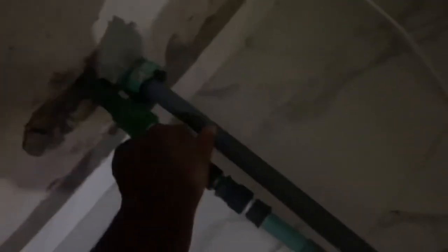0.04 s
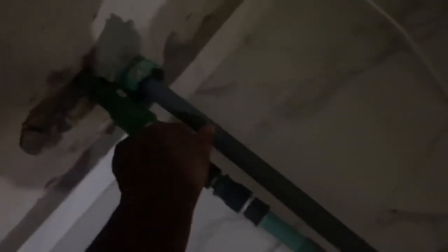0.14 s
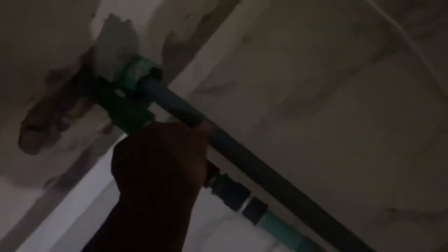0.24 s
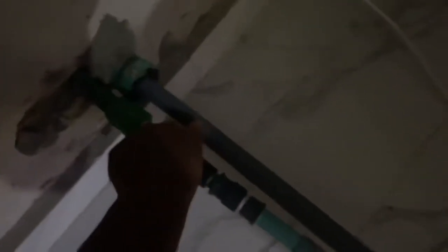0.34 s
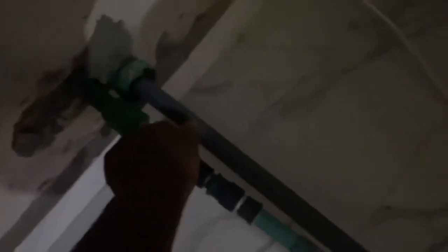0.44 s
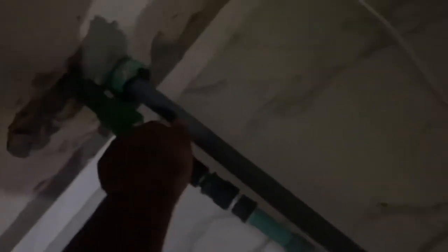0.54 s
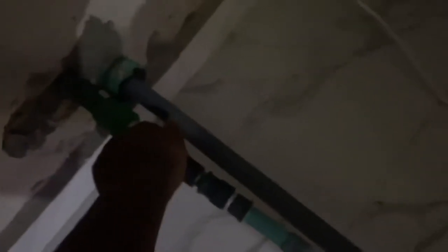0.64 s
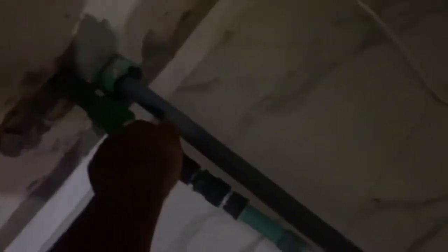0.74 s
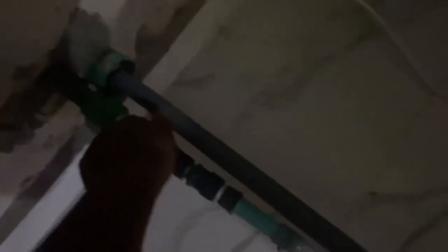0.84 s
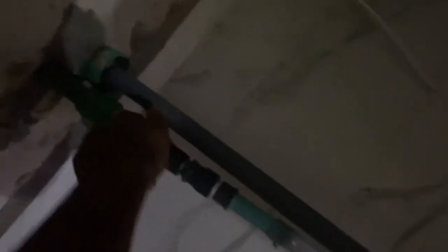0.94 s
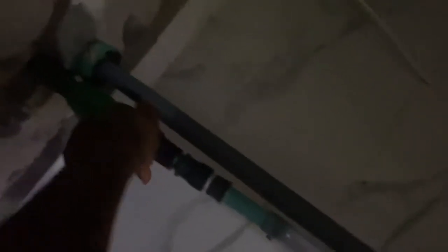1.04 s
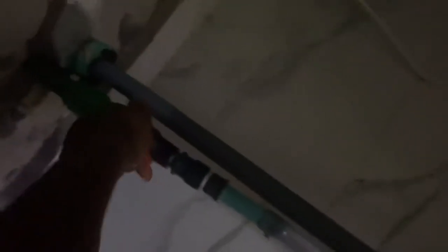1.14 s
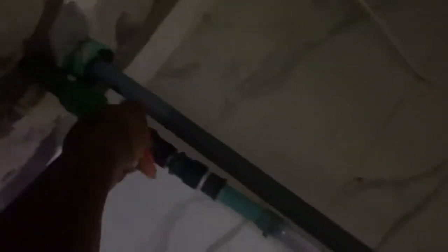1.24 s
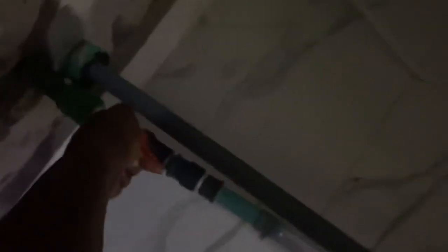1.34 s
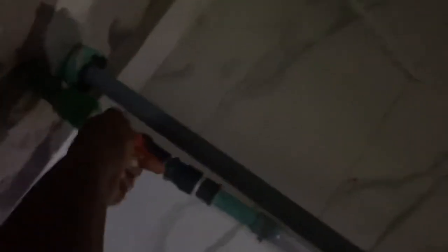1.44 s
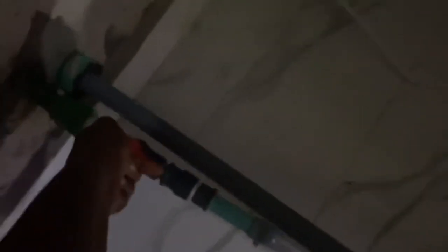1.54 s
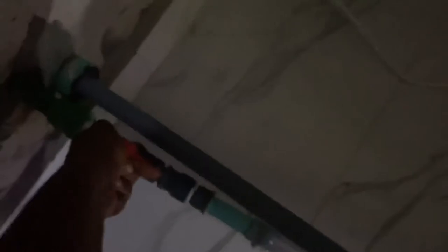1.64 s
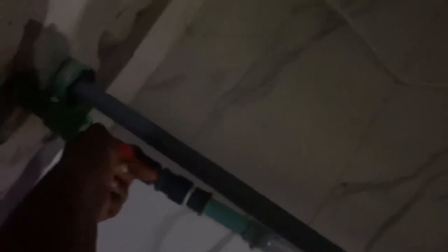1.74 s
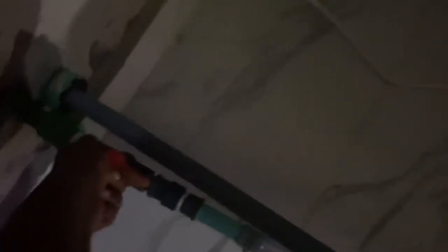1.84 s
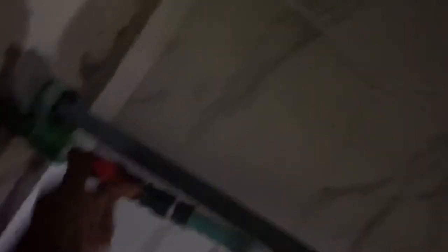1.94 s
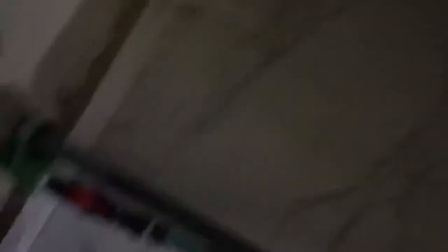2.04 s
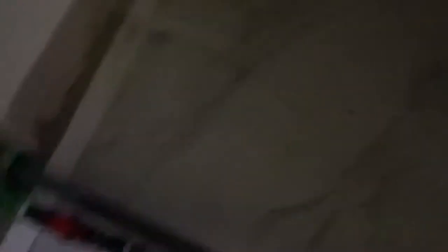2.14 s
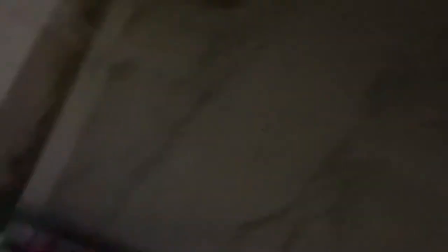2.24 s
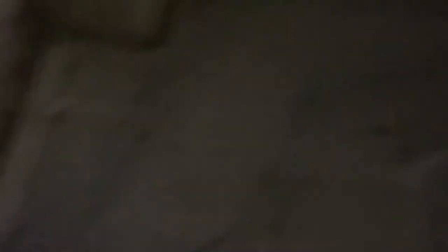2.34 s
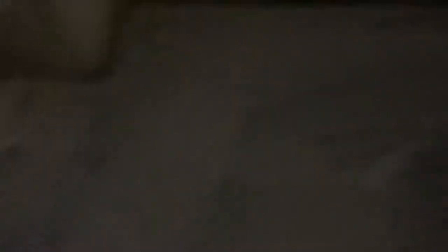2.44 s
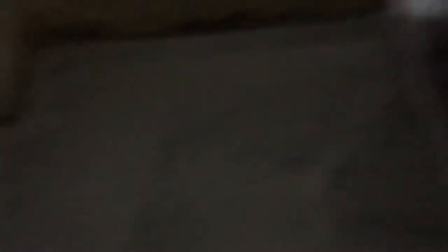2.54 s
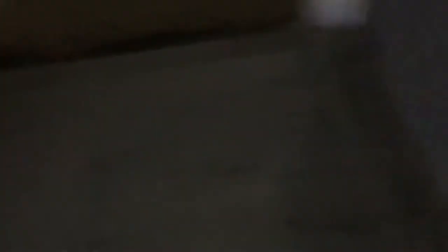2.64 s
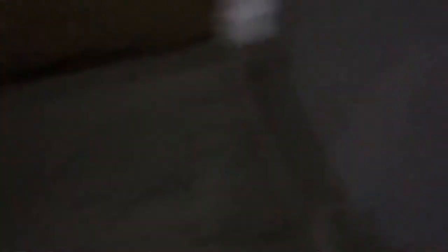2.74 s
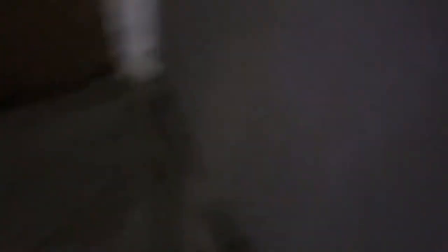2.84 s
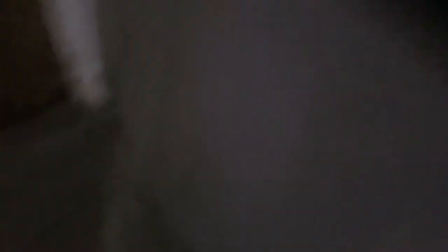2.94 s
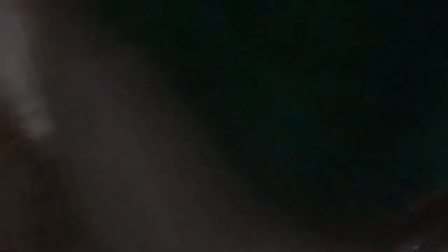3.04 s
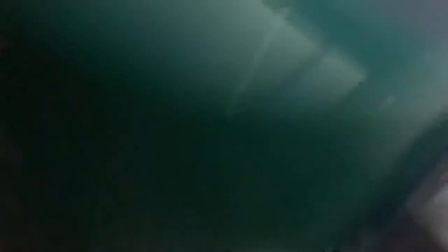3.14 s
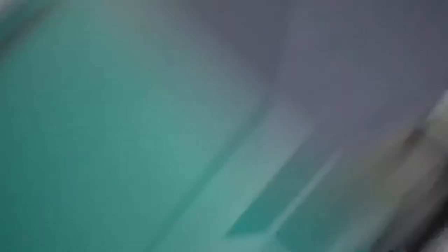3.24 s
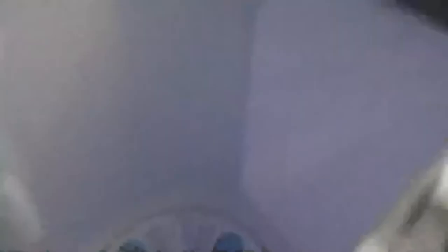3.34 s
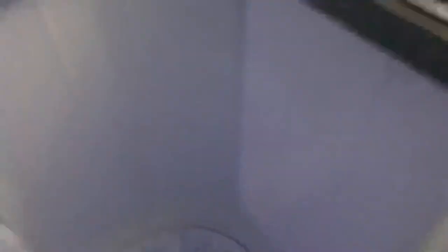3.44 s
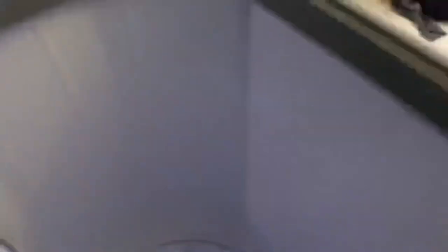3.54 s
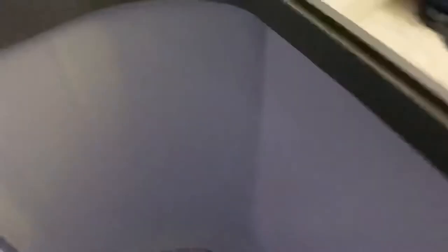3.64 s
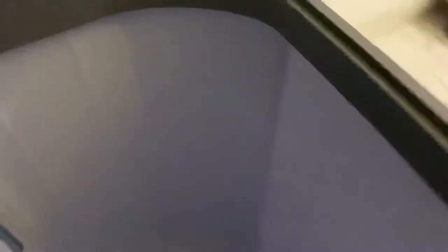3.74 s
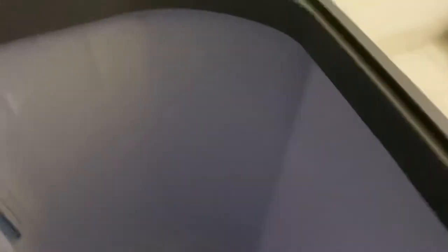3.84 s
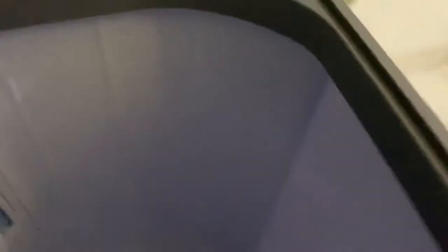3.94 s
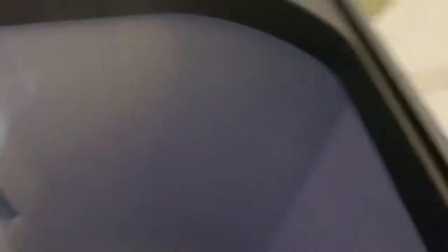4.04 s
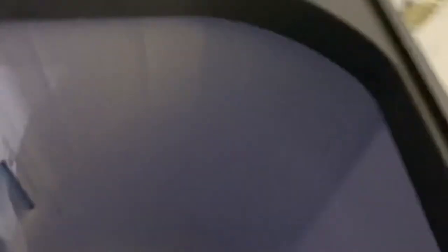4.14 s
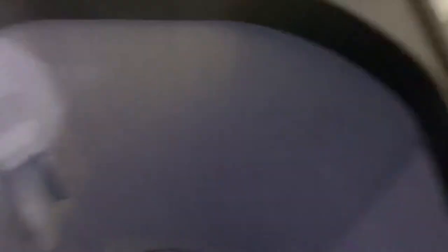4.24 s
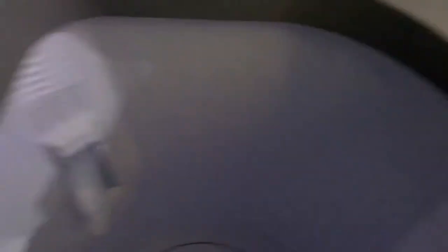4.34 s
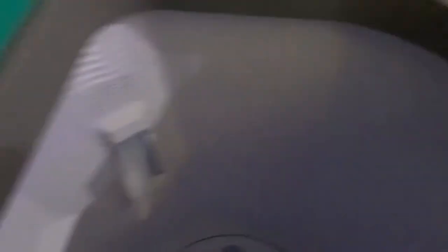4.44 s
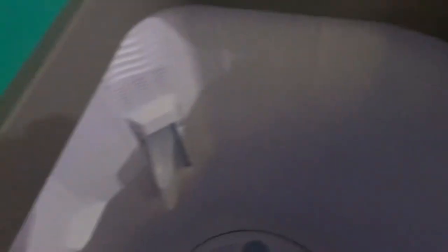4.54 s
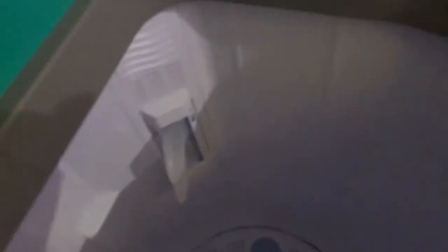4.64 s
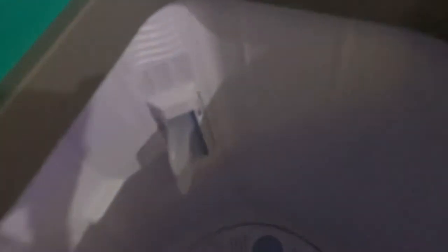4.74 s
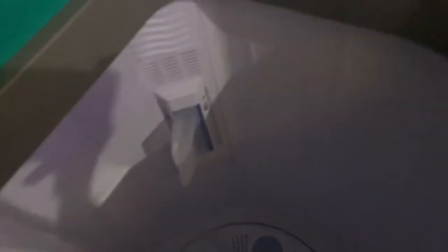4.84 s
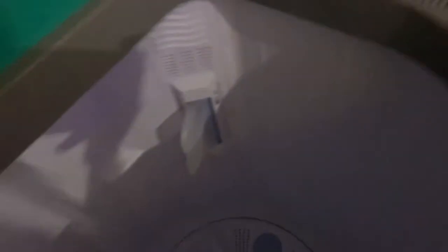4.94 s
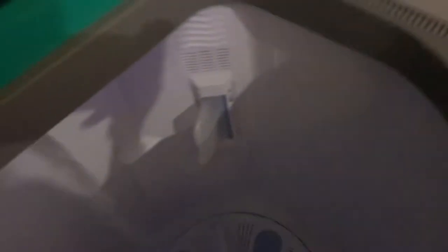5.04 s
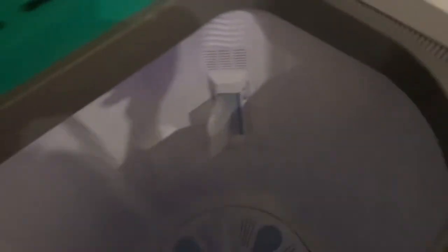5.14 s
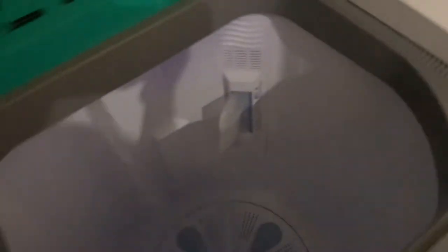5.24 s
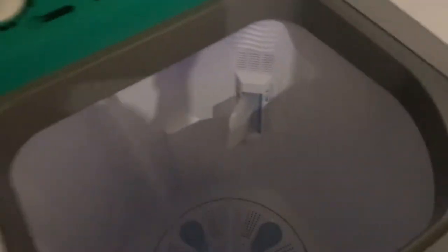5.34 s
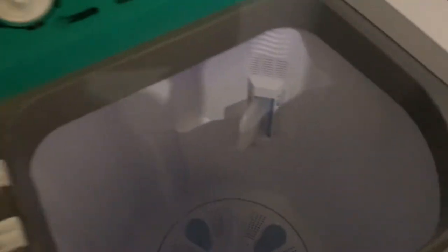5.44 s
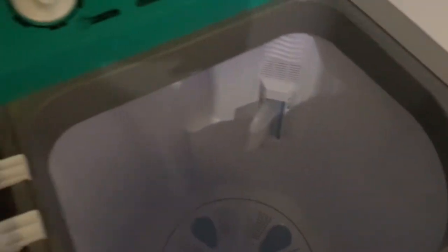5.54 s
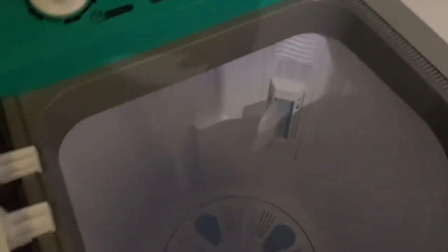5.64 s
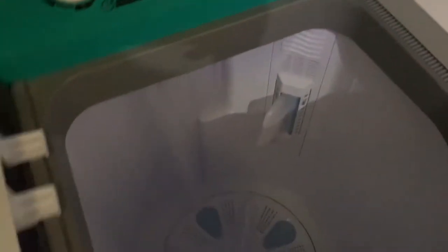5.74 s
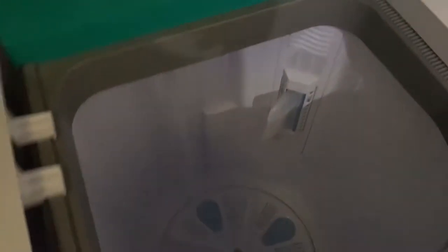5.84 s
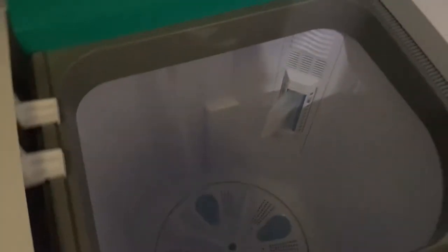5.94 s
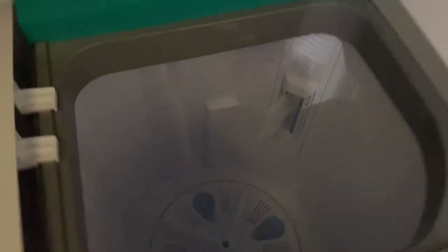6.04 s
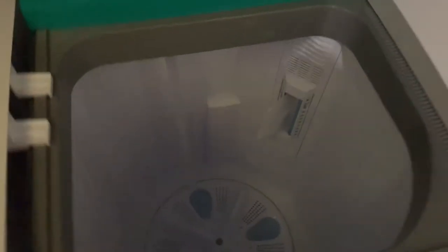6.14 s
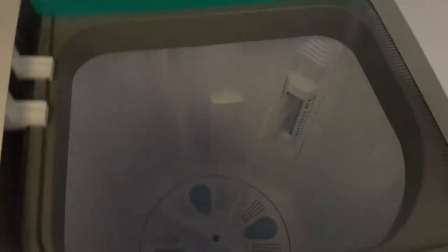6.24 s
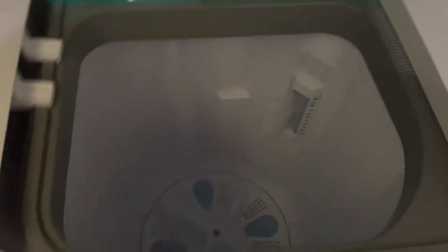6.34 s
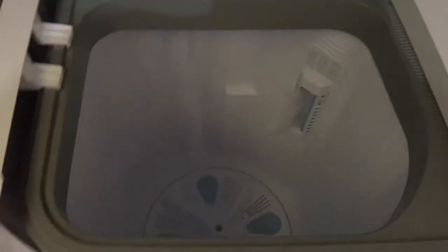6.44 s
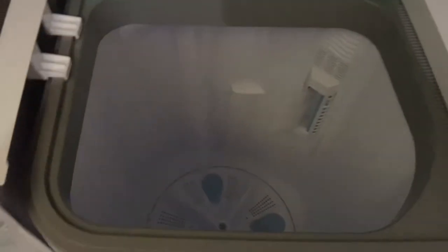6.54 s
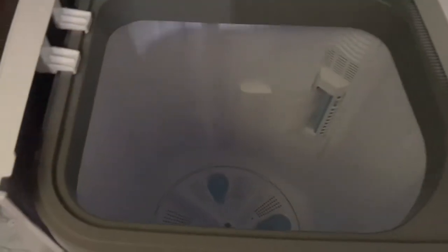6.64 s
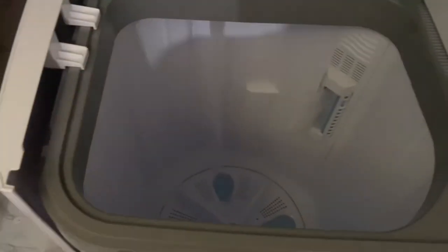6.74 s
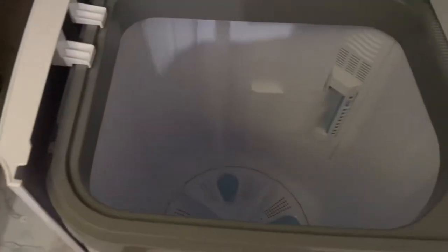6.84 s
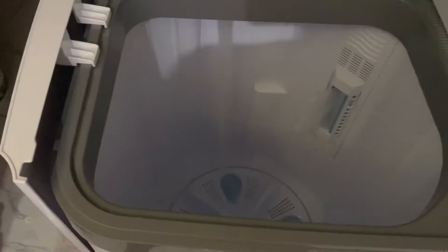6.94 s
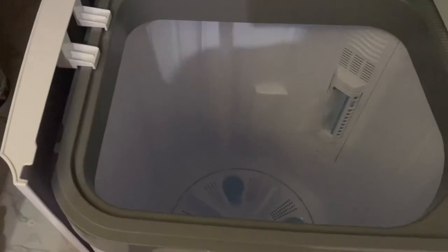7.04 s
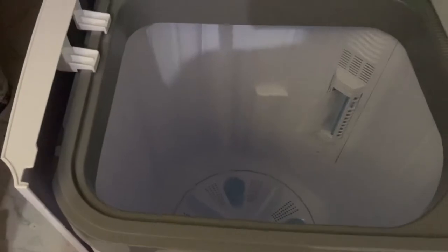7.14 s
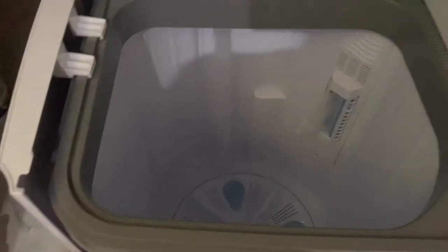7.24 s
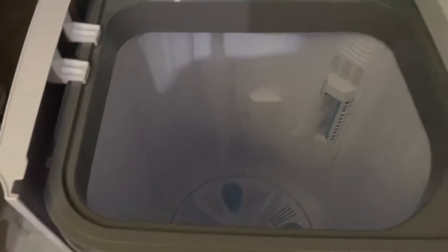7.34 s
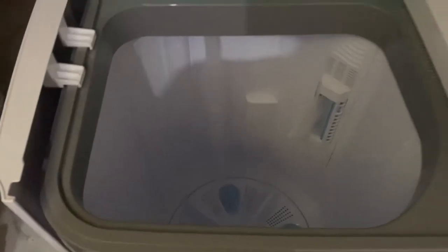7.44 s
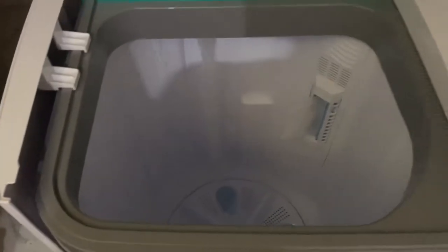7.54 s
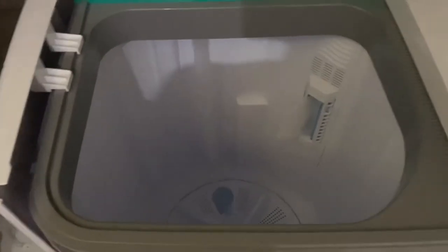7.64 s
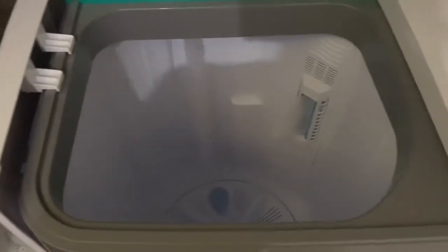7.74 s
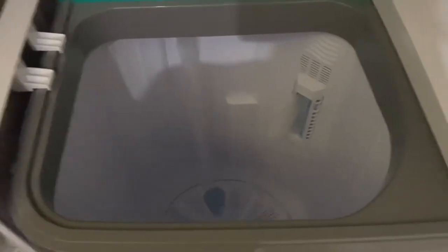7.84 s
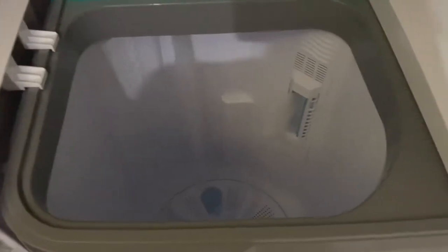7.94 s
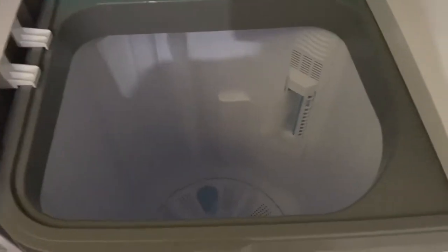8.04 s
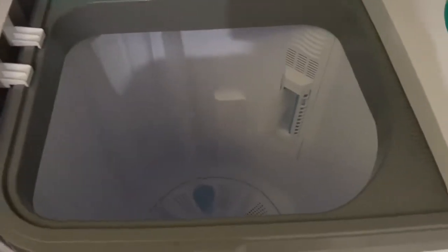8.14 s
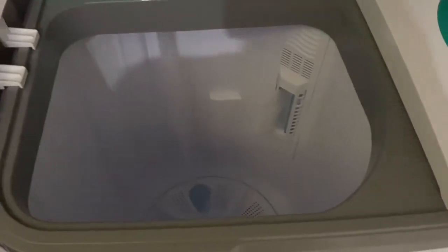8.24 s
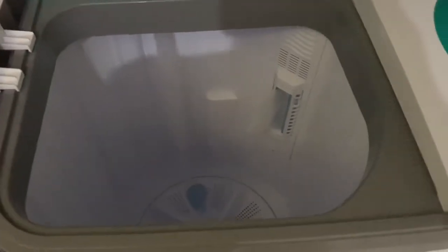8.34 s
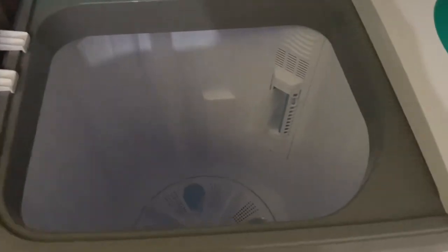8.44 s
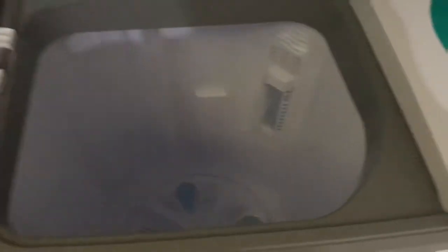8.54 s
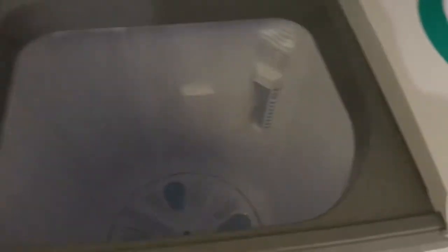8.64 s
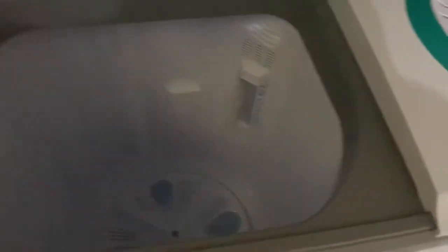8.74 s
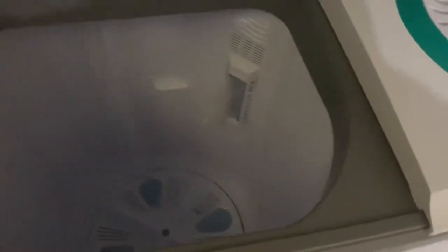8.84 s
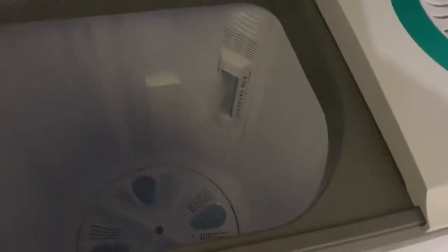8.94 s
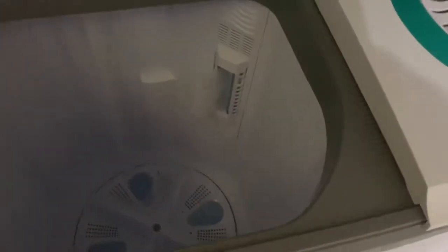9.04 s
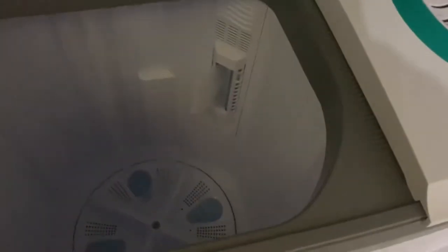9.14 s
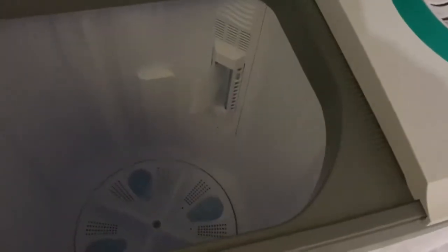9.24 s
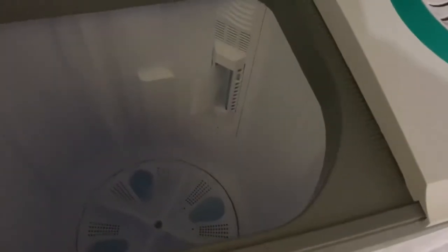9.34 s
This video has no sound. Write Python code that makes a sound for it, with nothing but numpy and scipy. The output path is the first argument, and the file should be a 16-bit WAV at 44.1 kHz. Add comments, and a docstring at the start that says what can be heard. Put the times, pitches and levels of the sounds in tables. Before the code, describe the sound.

A tap handle creaks and snaps open; hissing water follows, swelling to a close, hollow splashing roar in a plastic tub, then easing back while running.

```python
"""Fingers rub a stiff tap handle in a small hard room; it clicks and rings the tap (noise and decaying sines).
Water then hisses in the pipe (filtered noise), shudders in a hose and rushes into an empty plastic tub: impulses
drum the tub's modes and feed spray and splash, with splats (noise bursts), thumping slugs and gurgling bubbles.
The microphone pair moves from the tap past the tub to its rim, where big drops start to crack on bare plastic;
then it goes over the tub and draws back, the jet still running."""
import sys
import numpy as np
from scipy import signal
from scipy.fft import rfft, irfft, next_fast_len
from scipy.io import wavfile
from scipy.ndimage import map_coordinates

SR = 44100
rng = np.random.default_rng(int(sys.argv[2]) if len(sys.argv) > 2 else 0)


def unload_wav(signal):
    """Save mono or channel-first audio to the path in sys.argv[1] as 16-bit WAV at rate SR, clipped to [-1, 1]."""
    wavfile.write(
        sys.argv[1],
        SR,
        np.round(np.clip(np.atleast_2d(signal).T, -1, 1) * 32767).astype(np.int16),
    )


N = 414540  # samples

# motion: (time [s], power share at the tap, beside the tub, at the rim, over the tub, drawn back)
PLACE_SHARES = [(0, 0.86, 0.15, 0.019, 0, 0.025), (2.55, 0.97, 0.12, 0, 0, 0),
                (2.95, 0.14, 0.98, 0, 0, 0.009), (3.35, 0, 1, 0.048, 0.02, 0),
                (3.7, 0.0064, 0.085, 0.99, 0.003, 0.0071), (4.7, 0, 0, 0.92, 0.021, 0),
                (5.3, 0.0019, 0.0093, 0.084, 1, 0), (6.7, 0.033, 0, 0, 0.91, 0.097),
                (7.4, 0, 0, 0, 0.11, 0.96), (8.5, 0, 0.0041, 0, 0.061, 1), (9.4, 0, 0, 0.032, 0.44, 0.89)]
# microphones to landing point of the jet: (time [s], distance [m])
JET_DISTANCE_M = [(0, 0.85), (2.97, 0.93), (3.1, 0.53), (3.27, 0.26), (3.43, 0.24), (3.54, 0.33),
                  (3.8, 0.29), (4.05, 0.31), (4.45, 0.32), (4.72, 0.31), (4.85, 0.55), (5.5, 0.67),
                  (6.3, 0.76), (6.8, 0.59), (7.7, 0.85), (8.6, 0.72), (9.4, 0.53)]
# tap seeps, opens, is turned further: (time [s], flow [share of full jet])
FLOW_SHARE = [(0.34, 0.001), (0.38, 0.024), (0.5, 0.029), (0.56, 0.05), (0.778, 0.06), (0.805, 0.55),
              (1.3, 0.48), (1.5, 0.74)]
# one row per place, at full flow: (spray at 1 m [dB], splash at 1 m [dB], hose [dB])
PLACE_LEVELS_DB = [(-32, -35.5, -25.5), (-31.7, -40, -40), (-30.7, -41.7, -40), (-31.3, -45.7, -62),
                   (-30.2, -43.3, -53)]

# room noise spectrum: (frequency [Hz], relative level [dB])
ROOM_SPECTRUM = [(15, -33), (25, -5), (80, 0.5), (139, -10), (186, 0), (250, -20), (400, -13), (540, -8.5),
                 (1000, -28), (2430, -32.5), (8320, -41), (15000, -52)]
# strokes of fingers on the handle: (time [s], start level [dB rms], t60 [s])
RUB_STROKES = [(0.0, -48, 0.19), (0.185, -69, 0.3), (0.34, -50, 0.8), (0.362, -53, 0.18), (0.48, -49, 0.42),
               (0.65, -54.5, 0.27)]
# skin on plastic: (frequency [Hz], relative level [dB])
SKIN_SPECTRUM = [(300, -12), (1500, -9), (4000, -4), (9000, 3), (13000, -5), (15500, -18.5)]
# fine spray: (frequency [Hz], relative level [dB])
SPRAY_SPECTRUM = [(1000, -38.5), (3500, -8), (6000, -2.5), (8500, -1), (11000, 0), (13000, 2),
                  (15700, -8.5)]
# coarse splashing: (frequency [Hz], relative level [dB])
SPLASH_SPECTRUM = [(500, -24), (1000, -16), (1550, -9), (2200, -3), (3000, -11), (4000, 1), (5600, -4.5),
                   (7500, -15), (11000, -27)]
# tub drumming at full flow: (time [s], level [dB])
DRUM_LEVEL = [(0.8, -28), (0.87, -34), (0.96, -24.5), (1.02, -28), (1.14, -29.5), (1.2, -24), (1.27, -27),
              (1.45, -23), (1.57, -26.5), (1.87, -23.5), (2.36, -28.5), (2.75, -28.5), (3.05, -23),
              (3.2, -21.5), (3.36, -18.5), (3.5, -22), (3.68, -20.5), (3.77, -25.5), (3.88, -19.5),
              (3.98, -26), (4.15, -23), (4.4, -22), (4.74, -23.5), (4.8, -27.5), (5.05, -29.5), (5.5, -32),
              (6.3, -34.5), (7.0, -33), (7.7, -33), (8.35, -30.5), (8.8, -34), (9.4, -34)]
# tub modes: (centre [Hz], width at half gain [Hz],
#   gain at the tap, beside the tub, at the rim, over the tub, drawn back [dB])
TUB_MODES = [(67, 12, -13, -24, -14, -28, 2), (78.3, 20, 3, -24, -12, -5, 8.5),
             (108, 13, -1, -4, 3.5, 8.5, 1.5), (127, 18, -3, -12, -13, -24, -2.5),
             (156.4, 27.4, 2, 6, -1, -2.5, -6), (184, 23, 0.5, -15, -3, -8, -1),
             (206.7, 13, 2, -3, -12, -3, 11), (278.2, 53, -3.5, -2.5, -5, 0.5, 1),
             (339.7, 31.7, 1.5, 2, -4, -4.5, -4.5), (380.6, 54.5, -6.5, -5, 0.5, -4, -22),
             (440, 20, -10.5, -15, -19, -16, -10), (542.4, 61, -14, -18, -13, -15, -14),
             (578, 27, -35, -29, -21, -24, -5), (669, 77, -19.5, -10.5, -11, -14, -18),
             (725, 26, -28, -8.5, -24, -27, -23), (829, 115, -42, -31, -27.5, -16, -21.5),
             (1061, 40, -31, -18, -30, -22, -15.5), (1234, 37, -33, -24, -43, -31, -20),
             (1280, 520, -37, -31.5, -35.5, -28.5, -27.5)]
# drumming, one row per place: (left microphone lag [ms], left over right [dB], unrelated part [dB])
DRUM_BEARING = [(0.28, -1.1, -12.5), (0.17, 0.5, -15), (-0.029, 1.0, -16.5), (-0.086, -0.5, -16.5),
                (-0.046, -0.5, -14)]
# hose shudder: (frequency [Hz], relative level [dB])
HOSE_SPECTRUM = [(20, -20), (38, -20), (46, -4), (54, 8.5), (63, 0), (80, -4), (140, -36.5)]
# handle clicks: (time [s], dry crack peak [dB], tap ring gain [dB], crack centre [Hz])
HANDLE_CLICKS = [(0.367, -44, -64, 2500), (0.445, -29, -64, 8500), (0.484, -39, -68, 6000),
                 (0.509, -24, -34, 8000), (0.524, -36, -44, 4000), (0.579, -33, -58, 5000)]
# modes of the plastic tap: (frequency [Hz], mean level [dB], t60 [s])
TAP_MODES = [(540, -11, 0.1), (1400, -14, 0.08), (2260, -5, .04), (2445, 1, 0.08), (2650, -11, .04),
             (3316, -7, .07), (4689, -14, .07), (5400, -13, .06)]
# tap and coupling, loudest as the microphones pass the hose: (time [s], dry level [dB])
HISS_LEVEL = [(0.77, -68), (0.805, -43.5), (0.95, -46), (1.09, -39.5), (1.36, -49), (1.53, -38),
              (1.68, -39), (1.8, -36), (1.9, -38), (2.2, -37.5), (2.32, -40), (2.39, -33), (2.47, -37),
              (2.56, -32.5), (2.68, -36), (2.8, -39.5), (3.4, -37)]
# hiss in the pipe: (frequency [Hz], relative level [dB])
PIPE_SPECTRUM = [(300, -26.5), (520, 6), (750, 3), (1150, -1.5), (1700, -9.5), (2700, 3.5), (3800, 2.5),
                 (5500, -1.5), (8200, 2.5), (12000, -27)]
# lumps of the jet landing: (time [s], nominal level [dB], centre [Hz])
SPLAT_EVENTS = [(0.8096, -26, 2450), (0.836, -27, 2200), (0.973, -20, 3900), (1.512, -19, 4900),
                (1.6, -19, 3600), (1.81, -21, 3800), (2.385, -18, 3600), (2.525, -20, 3500),
                (3.164, -14.5, 3770), (3.233, -5, 4200), (3.345, -9, 3160), (3.4465, -10, 4020),
                (3.463, -9, 3650), (3.637, -12, 3410), (3.7635, -8, 3850), (3.901, -9.5, 3420),
                (4.1438, -6.5, 4000), (4.1795, -10.5, 3860), (4.257, -16, 3780), (4.281, -10, 3120),
                (4.304, -8.5, 5900), (4.3444, -15, 6030), (4.403, -11, 5100), (4.475, -11.5, 3030),
                (4.505, -12.5, 3900), (4.628, -8, 3770), (4.674, -10, 6500), (4.705, -12, 4000),
                (4.8685, -20, 5460), (4.886, -14.5, 4300), (4.93, -12, 5370), (4.97, -16, 5300),
                (5.027, -17, 6000), (5.149, -22, 3550), (5.2567, -18, 6120), (5.322, -18, 3980),
                (5.4393, -19, 6520), (5.803, -21, 5500), (5.945, -23, 3820), (6.0175, -18.5, 6450),
                (6.148, -16, 7000), (6.279, -23, 4580), (6.404, -18.5, 3400), (6.556, -18, 4500),
                (6.687, -17.5, 3830), (6.8007, -18, 3730), (6.871, -18.5, 4810), (7.024, -16, 3830),
                (7.037, -15.5, 3900), (7.0542, -13, 2700), (7.3035, -23, 4180), (7.3602, -18, 4370),
                (7.4718, -12.5, 6530), (7.505, -15, 5140), (7.535, -19, 6430), (7.5655, -17, 3630),
                (7.832, -19, 4200), (7.848, -15, 6000), (7.8694, -7, 6360), (8.006, -23, 2100),
                (8.087, -22, 3500), (8.112, -12.5, 4400), (8.166, -17, 5110), (8.19, -21, 4300),
                (8.338, -14.5, 5800), (8.3754, -16.5, 2800), (8.386, -15.5, 5500), (8.455, -16, 6670),
                (8.739, -20, 4200), (8.8994, -19, 5240), (8.9288, -16, 4450), (8.9593, -14, 4280),
                (9.0543, -16.5, 4200), (9.192, -12, 4340), (9.326, -18, 4400)]
# slugs of water on the wall: (time [s], boom peak [dB], dry slap peak [dB], boom centre [Hz])
SLUGS = [(0.941, -14.5, -21, 260), (1.183, -19, -34, 110), (1.424, -16, -31, 339), (1.829, -16, -37, 188),
         (2.14, -17.5, -32, 342), (3.182, -15, -28, 339), (3.223, -12, -26, 331), (3.291, -9.5, -26, 151),
         (3.348, -11.5, -28, 330), (3.463, -9.5, -24, 380), (3.558, -16, -23, 400), (3.587, -12, -24, 160),
         (3.878, -12, -34, 363), (4.028, -17, -18.5, 393), (4.156, -11.5, -27, 377),
         (4.281, -8, -12.5, 369), (4.454, -12, -39, 355), (4.541, -8, -26.5, 345), (4.619, -12.5, -19, 371),
         (4.727, -15.5, -32, 371), (4.752, -12.5, -25, 366), (4.868, -19, -27, 366), (5.833, -36, -24, 350),
         (6.38, -22.5, -42, 304), (7.36, -27, -39, 312), (7.697, -23, -26.5, 573), (8.168, -23, -27, 207),
         (8.43, -22, -32, 283)]
# big drops on bare plastic: (time [s], dry peak [dB], centre [Hz], half width [octaves])
BIG_DROPS = [(3.557, -2, 13200, 0.32), (3.8497, -7, 6605, 1.0), (3.902, -0.5, 7500, 1.1),
             (3.975, -11.5, 4000, 1.0), (4.2795, -4, 13000, 0.5), (4.3055, -2.5, 8000, 0.8),
             (4.394, -7, 10400, 1.0), (4.4196, -4, 13100, 0.45), (4.62, -4, 13200, 0.5),
             (4.866, -5, 13900, 0.5), (5.2065, -3, 8460, 0.63), (5.667, -11, 7542, 0.8),
             (5.8332, -8.5, 12000, 1.0), (6.557, -1.5, 10200, 0.92), (7.153, -3, 11100, 0.51),
             (7.3033, -8.5, 13000, 0.6), (7.6487, -5, 13300, 0.3), (8.0137, -7, 12800, 0.5),
             (8.188, -6, 13500, 0.35), (8.4212, -6.5, 7490, 1.0), (8.7783, -8, 9910, 0.87),
             (9.0135, -8, 14200, 0.5)]
# echo of tub and walls against direct sound: (frequency [Hz], level [dB])
ECHO_RATIO = [(300, -12), (1000, 6), (2000, 6.5), (4500, 7.5), (7000, 10.5), (9000, 2), (12000, -33),
              (15000, -21)]
# room decay: (frequency [Hz], t60 [s])
ROOM_T60 = [(200, .25), (2000, 0.16), (6000, 0.11), (14000, 0.011)]

TOP_HZ = 15780  # band limit
LEFT_LAG_S = 0.000297  # direct sound other than the drumming
ROOM_DB = -62
RUB_RISE_S = 0.0019
SPLASH_SWELL_DB, SPLASH_SWELL_KNOTS_PER_S = 1.4, 9
HOSE_SWELL_DB, HOSE_SWELL_KNOTS_PER_S = 1.1, 5.04
GURGLE_DB = -32  # at full flow, before the place shares
SPLAT_CRACK_DB, SPLAT_RING_DB = 1, -1  # relative to the splat's nominal level
SPLAT_LOW_HZ = 2050  # high-pass corner
BOOM_FOCUS, BOOM_HALF_OCTAVES = 1.06, 0.84  # exponent favours the strongest modes
WASH_SCATTER_SHARE = 0.32  # power share of the echo scattered at once by the tub wall
CLOSE_ECHO_DB, CLOSE_SCATTER_SHARE = 0, 0.55  # clicks, splats, drops: more of the echo at once


def amp(db):
    """Decibels to gain."""
    return 10 ** (np.asarray(db) / 20)


def unit(x):
    """Scale to rms 1."""
    return x / np.sqrt(np.mean(x ** 2) + 1e-20)


def along(points, hz):
    """Read (Hz, value) points on a log frequency axis."""
    point_hz, values = np.transpose(points)
    return np.interp(np.log(hz + 1), np.log(point_hz + 1), values)


def curves(rows):
    """One value per sample for each column after the time."""
    time_s, *columns = np.transpose(rows)
    return [np.interp(np.arange(N) / SR, time_s, column) for column in columns]


def wobble(knots_per_s):
    """Smooth random curve through random knots."""
    knots = rng.standard_normal(int(N * knots_per_s / SR) + 4)
    return map_coordinates(knots, [np.arange(N) * knots_per_s / SR])


def filtered(x, response):
    """Multiply the spectrum of x by a complex response of frequency."""
    size = next_fast_len(N + SR // 2)
    spectrum = rfft(x, size) * response(np.fft.rfftfreq(size, 1 / SR))
    return irfft(spectrum, size)[..., :N]


def ringing(gain, size=16384):
    """Minimum-phase impulse response with this gain over frequency."""
    log_gain = np.log(np.maximum(gain(np.fft.rfftfreq(size, 1 / SR)), 1e-6))
    cepstrum = irfft(log_gain)
    # fold onto positive time
    cepstrum[1:size // 2] *= 2
    cepstrum[size // 2 + 1:] = 0
    return irfft(np.exp(rfft(cepstrum)))


def through(x, gain):
    """Play x through a causal filter."""
    return signal.oaconvolve(x, ringing(gain))[:N]


def shaped(x, spectrum):
    """Colour x by a (Hz, dB) table, rms 1."""
    return unit(through(x, lambda hz: amp(along(spectrum, hz))))


def add(track, time_s, sound):
    """Mix a sound into a track in place."""
    span = track[max(round(time_s * SR), 0):][:len(sound)]
    span += sound[:len(span)]


def impacts(rate_hz, spread_db):
    """Random impulses of unequal size and sign, rms 1."""
    struck = rng.random(N) < rate_hz / SR
    sign = np.sign(rng.standard_normal(N))
    size = amp(spread_db * np.clip(rng.standard_normal(N), -2, 2))
    return unit(struck * sign * size)


def octave_bell(hz, centre_hz, half_octaves):
    """Bell-shaped gain on an octave axis, half at half_octaves from the centre."""
    return 1 / (1 + (np.log2((hz + 1) / centre_hz) / half_octaves) ** 2)


def burst(centre_hz, half_octaves, rise_s, crack_t60, tail_db, tail_t60, size=4096):
    """A drop bursts: band noise with a crack and a slower patter of droplets, peak 1."""
    t, hz = np.arange(size) / SR, np.fft.rfftfreq(size, 1 / SR)
    band = octave_bell(hz, centre_hz, half_octaves) * (hz < TOP_HZ)
    noise = irfft(rfft(rng.standard_normal(size)) * band)
    rise = 1 - np.exp(-t / rise_s)
    decay = amp(-60 * t / crack_t60) + amp(tail_db - 60 * t / tail_t60)
    sound = noise * rise * decay
    return sound / np.abs(sound).max()


def room_tone():
    """Steady room noise: one coloured noise, the same in both channels."""
    return amp(ROOM_DB) * shaped(rng.standard_normal(N), ROOM_SPECTRUM)


def rubs():
    """Skin sticks and slips on the plastic handle in short, fading strokes."""
    t = np.arange(N) / SR
    stroke = np.zeros(N)
    for time_s, db, t60 in RUB_STROKES:
        age = np.maximum(t - time_s, 0)
        stroke += (1 - np.exp(-age / RUB_RISE_S)) * amp(db - 60 * age / t60)
    slips = impacts(1800, spread_db=2.0) * amp(2 * wobble(55))
    return stroke * shaped(slips, SKIN_SPECTRUM)


def local_levels():
    """Spray, splash and hose dB, blended between the places that the microphones pass."""
    shares = np.clip(curves(PLACE_SHARES), 0, 1)
    return np.transpose(PLACE_LEVELS_DB) @ (shares / shares.sum(axis=0))


def splashes(rate_hz, centre_hz, scatter, half_octaves, rise_s, life_t60, spread_db, count, size=1024):
    """Small bursts at random moments, each with its own pitch, rms 1."""
    track = np.zeros(N)
    times_s = np.cumsum(rng.exponential(1 / rate_hz, count))
    draws = np.clip(rng.standard_normal((count, 2)), -2, 2)
    for time_s, (pitch, strength) in zip(times_s, draws):
        drop_hz = centre_hz * np.exp(scatter * pitch)
        drop = burst(drop_hz, half_octaves, rise_s, life_t60, tail_db=-4, tail_t60=4 * life_t60, size=size)
        add(track, time_s, amp(spread_db * strength) * drop)
    return unit(track)


def bubbles(rate_hz, centre_hz, scatter, cycles, glide, spread_db, count, size):
    """Trapped air rings for some cycles, each bubble at its own pitch, which rises by the share glide; rms 1."""
    draws = rng.standard_normal((count, 2)).clip(-2, 2)
    starts = (SR * np.cumsum(rng.exponential(1 / rate_hz, count))).astype(int)
    turns = centre_hz * np.exp(scatter * draws[:, :1]) * np.arange(size) / SR
    age = np.minimum(turns / cycles, 1)
    level = amp(spread_db * draws[:, 1:] - 60 * age) * (age < 1)
    rings = level * np.sin(2 * np.pi * turns * (1 + glide * age / 2))
    positions = starts[:, None] + np.arange(size)
    return unit(np.bincount(positions.ravel(), rings.ravel(), N)[:N])


def water(flow, surge, spray_db, splash_db):
    """Spray and splash grow with flow and nearness; single droplets stand out more away from the tap."""
    distance_m, = curves(JET_DISTANCE_M)
    in_view = 1 - 0.42 * np.clip(curves(PLACE_SHARES)[0], 0, 1)
    cracks = in_view ** 2 * impacts(70, spread_db=3.0)  # droplets on bare plastic, in both layers

    mist = impacts(11000, spread_db=3.5) * amp(2.1 * in_view * surge)
    ticks = splashes(80, centre_hz=10200, scatter=0.36, half_octaves=0.55, rise_s=0.00019,
                     life_t60=0.0074, spread_db=2.5, count=1100)
    spray = shaped(mist + amp(-5) * in_view * ticks + amp(-7) * cracks, SPRAY_SPECTRUM)

    patter = impacts(1100, spread_db=4)
    plips = splashes(120, centre_hz=4480, scatter=0.38, half_octaves=0.52, rise_s=0.0001,
                     life_t60=0.0037, spread_db=2.0, count=1500)
    trickle = bubbles(70, centre_hz=4600, scatter=0.24, cycles=60, glide=0.087,
                      spread_db=3, count=900, size=1024)
    spatter = patter + in_view * (amp(-3.0) * plips + amp(-5.5) * trickle)
    clumped = spatter * amp(1.4 * in_view * surge)
    splash = shaped(clumped + amp(-2) * cracks, SPLASH_SPECTRUM)

    swell_db = SPLASH_SWELL_DB * in_view * wobble(SPLASH_SWELL_KNOTS_PER_S)
    spray_part = amp(spray_db + 0.41 * swell_db) * spray
    splash_part = amp(splash_db + swell_db) * splash
    return flow / distance_m * (spray_part + splash_part)


def tub_gain(hz, place):
    """Gain of the tub's modes as heard from one place; deep bass does not radiate."""
    modes = sum(amp(db[place]) / (1 + (2 * (hz - centre) / width) ** 2) for centre, width, *db in TUB_MODES)
    return modes * hz ** 6 / (hz ** 6 + 54 ** 6)


def lagged(x, left_lag_s):
    """Stereo pair with the left channel late by left_lag_s, split evenly about zero."""
    return filtered(x, lambda hz: np.exp(np.outer([-1, 1], 1j * np.pi * hz * left_lag_s)))


def drumming(flow, surge):
    """The broken jet hammers the tub; modes and bearing depend on where one listens."""
    drum_db, = curves(DRUM_LEVEL)
    blows = impacts(1100, spread_db=2.5) * amp(1.34 * surge)
    sideways = impacts(1300, spread_db=3)
    pair = np.zeros((2, N))
    for place, (share, bearing) in enumerate(zip(curves(PLACE_SHARES), DRUM_BEARING)):
        lag_ms, pan_db, apart_db = bearing
        body = unit(through(blows, lambda hz: tub_gain(hz, place)))
        direct = lagged(body, lag_ms / 1000)
        # short waves differ more between the microphones
        apart = unit(through(sideways, lambda hz: tub_gain(hz, place) * np.hypot(hz, 230) / np.hypot(hz, 1300)))
        both = direct + np.outer([1, -1], amp(apart_db) * apart)
        pan = amp([[pan_db / 2], [-pan_db / 2]])
        pair += np.sqrt(np.clip(share, 0, 1)) * pan * both
    return pair * flow * amp(drum_db)


def hose(flow, shudder_db):
    """Turbulence makes the hose shudder against the machine: low noise, level as flow squared."""
    shudder = shaped(rng.standard_normal(N), HOSE_SPECTRUM)
    swell_db = HOSE_SWELL_DB * wobble(HOSE_SWELL_KNOTS_PER_S)
    return flow ** 2 * amp(shudder_db + swell_db) * shudder


def gurgle():
    """Air pockets gulp where the jet ploughs in, coloured by the tub, heard beside it or at its rim."""
    _, beside, rim, *_ = curves(PLACE_SHARES)
    gulps = bubbles(36, centre_hz=420, scatter=0.332, cycles=15, glide=0.2,
                    spread_db=2.2, count=500, size=4096)
    coloured = unit(through(gulps, lambda hz: np.sqrt(tub_gain(hz, place=2))))
    return amp(GURGLE_DB) * (beside + rim) * coloured


def handle_clicks():
    """Each click of the handle cracks and rings the tap's modes at new strengths."""
    track, t = np.zeros(N), np.arange(SR // 5) / SR
    for time_s, crack_db, ring_db, centre_hz in HANDLE_CLICKS:
        ring = np.zeros(len(t))
        for mode_hz, mode_db, t60 in TAP_MODES:
            level_db = mode_db + rng.normal(0, 1.8)
            ring += amp(level_db - 60 * t / t60) * np.sin(2 * np.pi * mode_hz * t)
        crack = burst(centre_hz, 1.8, rise_s=0.0002, crack_t60=0.0088, tail_db=-11, tail_t60=0.21)
        add(track, time_s, amp(ring_db) * ring)
        add(track, time_s, amp(crack_db) * crack)
    return track


def tap_hiss():
    """Water squeezing through the tap hisses unevenly in the pipe."""
    hiss_db, = curves(HISS_LEVEL)
    turbulence = rng.standard_normal(N) * amp(2.7 * wobble(18))
    running = np.arange(N) / SR > HISS_LEVEL[0][0]
    return running * amp(hiss_db) * shaped(turbulence, PIPE_SPECTRUM)


def splats():
    """Lumps of water crack on landing, ring briefly with trapped air, then scatter over the wet wall."""
    track = np.zeros(N)
    for time_s, db, hz in SPLAT_EVENTS:
        crack = burst(1.08 * hz, 1.0, rise_s=0.0001, crack_t60=0.0049, tail_db=-22, tail_t60=0.035)
        ring = burst(hz, 0.36, rise_s=0.002, crack_t60=0.022, tail_db=-12, tail_t60=0.11)
        add(track, time_s, amp(db + SPLAT_CRACK_DB) * crack)
        add(track, time_s, amp(db + SPLAT_RING_DB) * ring)
    return through(track, lambda hz: hz ** 4 / np.hypot(hz ** 4, SPLAT_LOW_HZ ** 4))


def thumps():
    """A slug of water pushes the wall once; where it lands decides which of the tub's modes boom."""
    track = np.zeros(N)
    for time_s, boom_db, _, centre_hz in SLUGS:
        boom = ringing(lambda hz: tub_gain(hz, place=2) ** BOOM_FOCUS
                       * octave_bell(hz, centre_hz, BOOM_HALF_OCTAVES))
        add(track, time_s, amp(boom_db) * boom / np.abs(boom).max())
    return track


def slaps():
    """The same slugs slap as they spread over the plastic."""
    track = np.zeros(N)
    for time_s, _, slap_db, _ in SLUGS:
        slap = burst(580, 0.58, rise_s=0.0014, crack_t60=0.032, tail_db=-11, tail_t60=0.1)
        add(track, time_s, amp(slap_db) * slap)
    return track


def drops():
    """Big drops crack on the bare plastic."""
    track = np.zeros(N)
    for time_s, db, hz, half_octaves in BIG_DROPS:
        crack = burst(hz, half_octaves, rise_s=0.0001, crack_t60=0.0052, tail_db=-19, tail_t60=0.08)
        add(track, time_s, amp(db) * crack)
    return track


def scattered(x, size=128):
    """The curved wall returns sound about a millisecond later, phases jumbled differently per microphone."""
    z = signal.stft(x, nperseg=size)[2]
    jumble = np.exp(2j * np.pi * rng.random((2, *z.shape)))
    pair = signal.istft(z * jumble, nperseg=size)[1]
    late = np.pad(pair, ((0, 0), (size // 2, 0)))[:, :N]
    return np.std(x) * unit(late)


def echoes(x, flutter_db, flutter_t60, order=2000, size=6144):
    """Jet and microphones keep moving, so each short stretch of sound gets a new pair of echo tails."""
    window = signal.windows.hann(2 * order, sym=False) ** 0.5
    padded = np.pad(x, (order, 2 * order))
    pieces = np.lib.stride_tricks.sliding_window_view(padded, 2 * order)[::order] * window
    hz, t, z = signal.stft(rng.standard_normal((len(pieces), 2, size)), SR, nperseg=128)
    # quick flutter between the tub walls, then the room
    fade = amp(flutter_db - 60 * t / flutter_t60) + amp(-60 * t / along(ROOM_T60, hz)[:, None])
    fade = fade / np.linalg.norm(fade, axis=1, keepdims=True)
    tails = signal.istft(z * fade, SR)[1]
    tails = tails / np.linalg.norm(tails, axis=2, keepdims=True)
    wet = signal.fftconvolve(pieces[:, None], tails, axes=2)
    out = np.zeros((2, len(pieces) * order + wet.shape[2]))
    for k, piece in enumerate(wet):
        out[:, k * order:][:, :piece.shape[1]] += piece
    return out[:, order:order + N]


def heard(x, echo_db, scatter_share):
    """Direct sound reaches the right microphone first; the echo comes from all around."""
    def wet(hz):
        return amp(along(ECHO_RATIO, hz) + echo_db)

    direct = filtered(lagged(x, LEFT_LAG_S), lambda hz: 1 / np.hypot(1, wet(hz)))
    share = np.clip(scatter_share, 0, 1)
    early = np.sqrt(share) * scattered(x)
    late = np.sqrt(1 - share) * echoes(x, flutter_db=6.5, flutter_t60=0.021)
    return direct + filtered(early + late, lambda hz: wet(hz) / np.hypot(1, wet(hz)))


def scene():
    """One flow curve drives drumming, hose, gurgle and spray; one surge unsettles drumming and spray."""
    flow, = curves(FLOW_SHARE)
    spray_db, splash_db, shudder_db = local_levels()
    surge = unit(wobble(24) + 0.14 * wobble(150))
    wash = rubs() + water(flow, surge, spray_db, splash_db) + tap_hiss() + slaps()
    close = handle_clicks() + splats() + drops()
    around = heard(wash, 0, WASH_SCATTER_SHARE) + heard(close, CLOSE_ECHO_DB, CLOSE_SCATTER_SHARE)
    around = around + hose(flow, shudder_db) + flow * gurgle() + thumps()
    balance = amp([[-0.4], [0.4]])  # left, right
    return room_tone() + drumming(flow, surge) + around * balance


def record(dry):
    """Nothing is kept above the band limit."""
    return filtered(dry, lambda hz: hz < TOP_HZ)


dry = scene()
out = record(dry)
unload_wav(out)
```